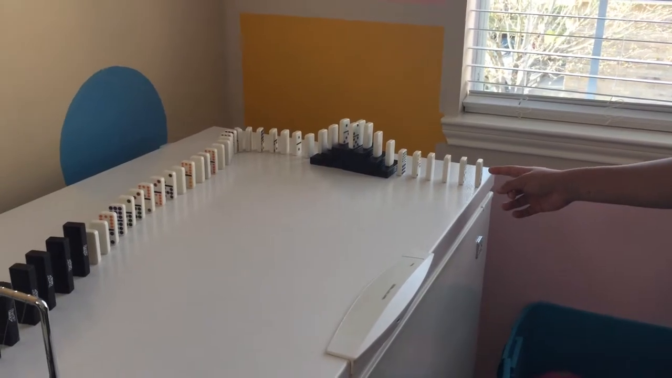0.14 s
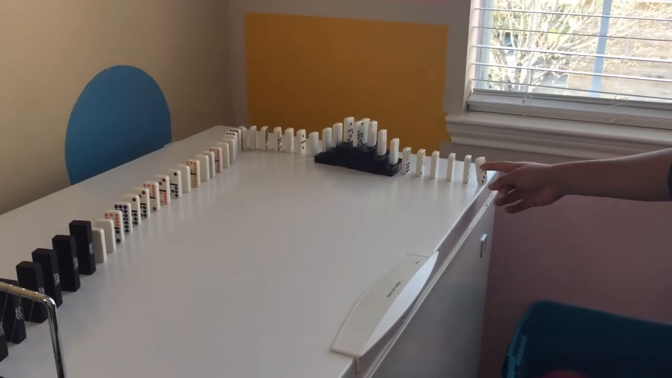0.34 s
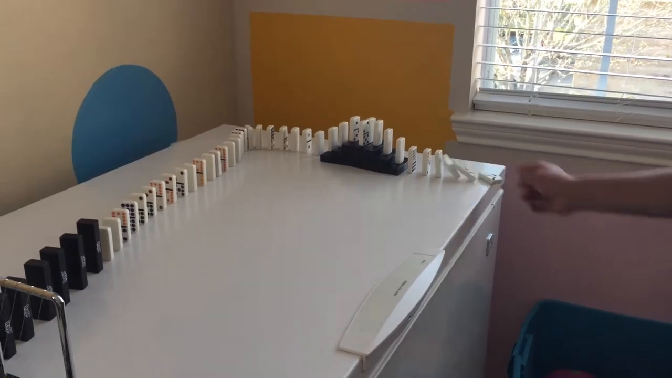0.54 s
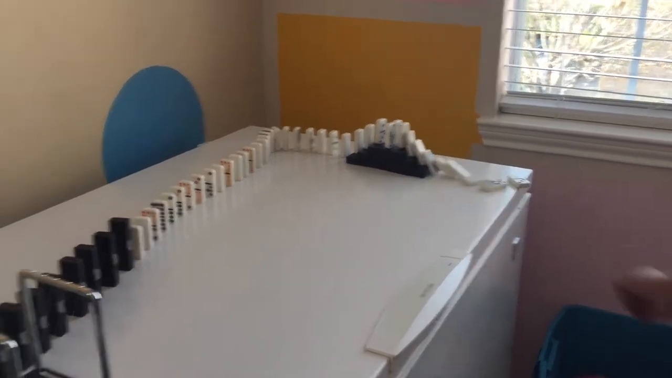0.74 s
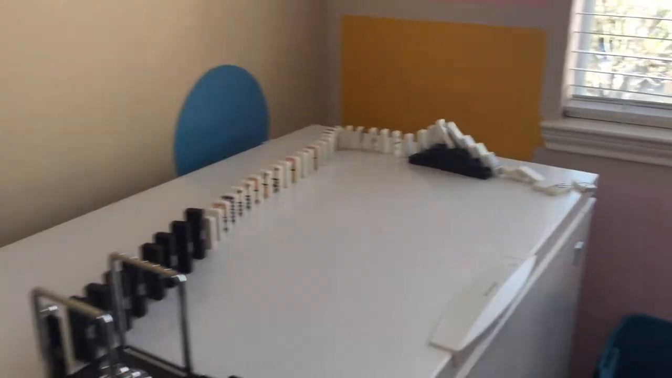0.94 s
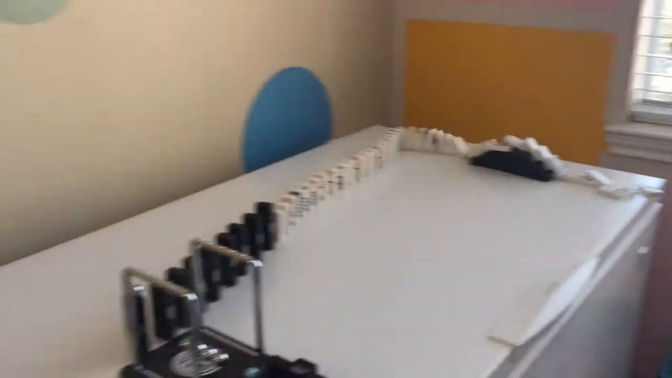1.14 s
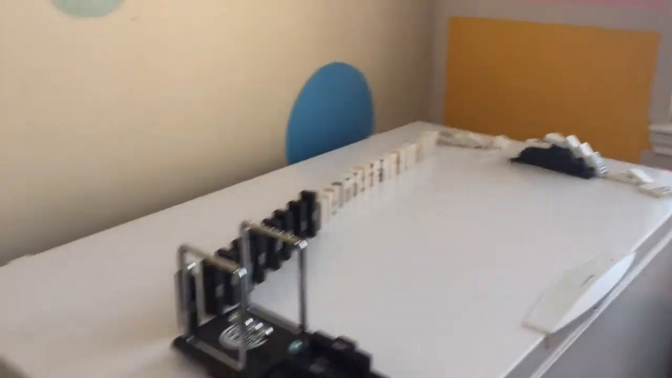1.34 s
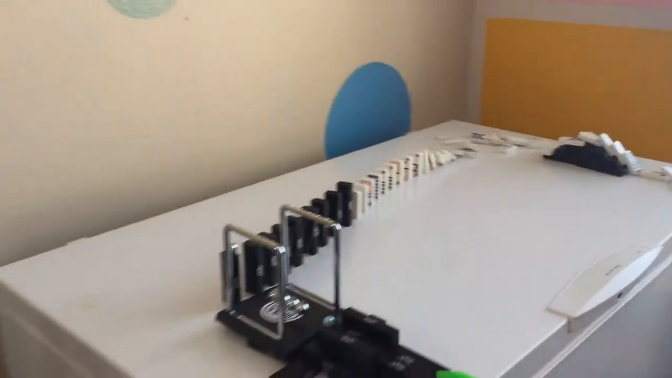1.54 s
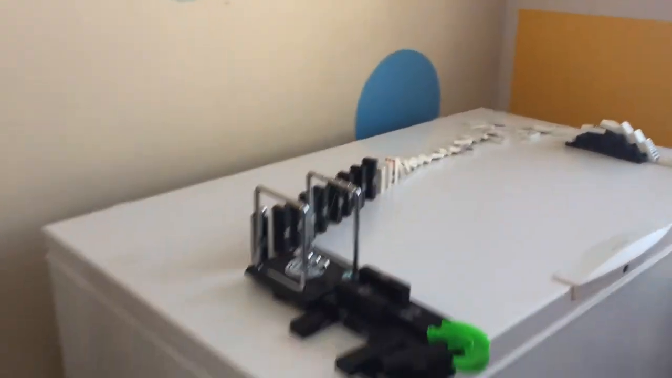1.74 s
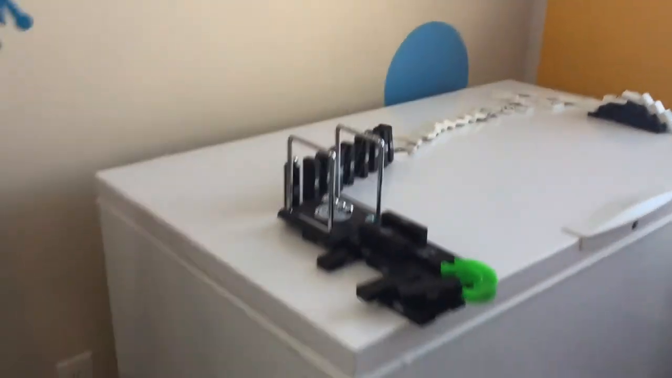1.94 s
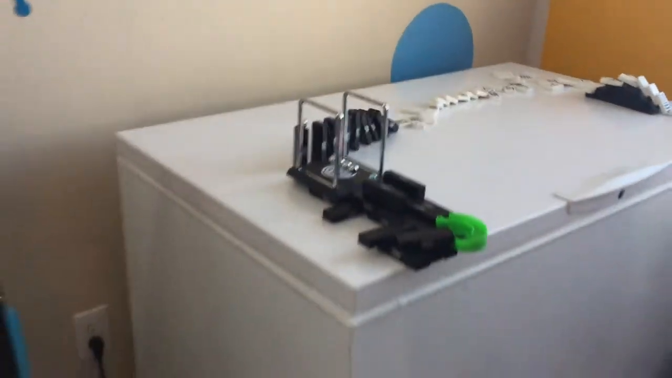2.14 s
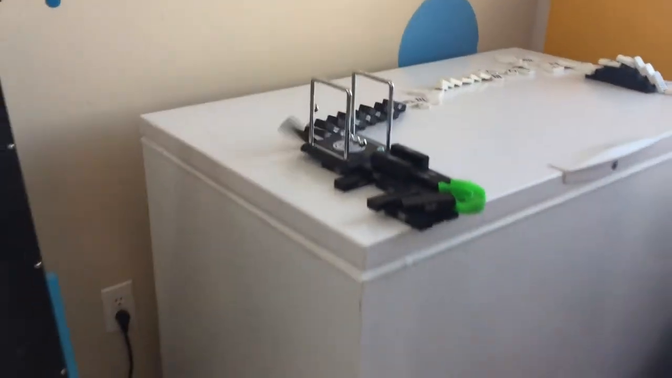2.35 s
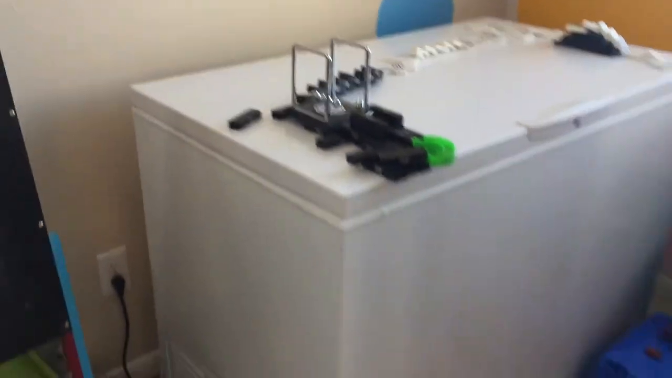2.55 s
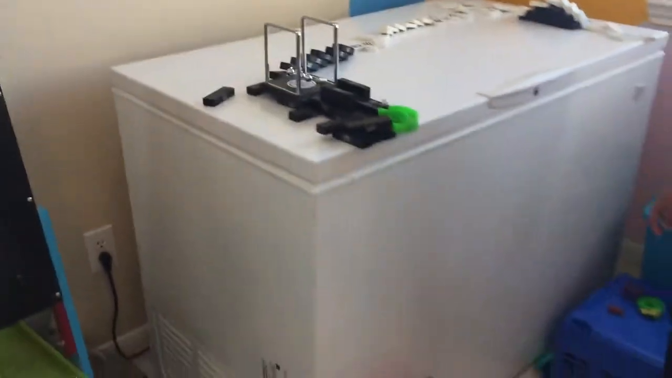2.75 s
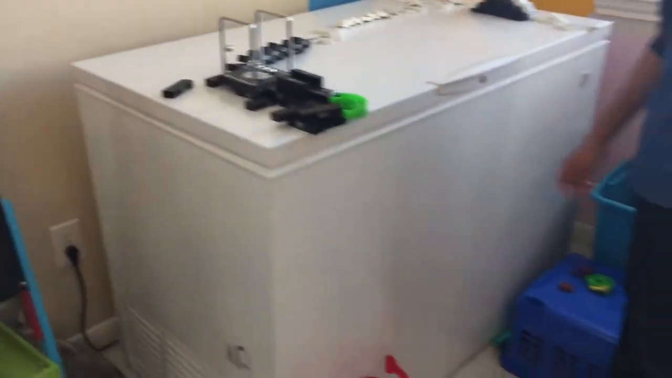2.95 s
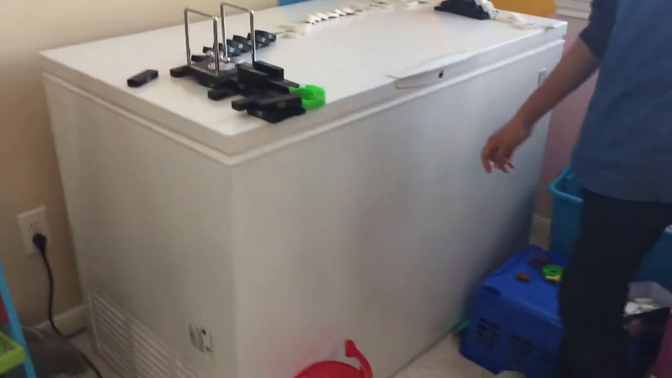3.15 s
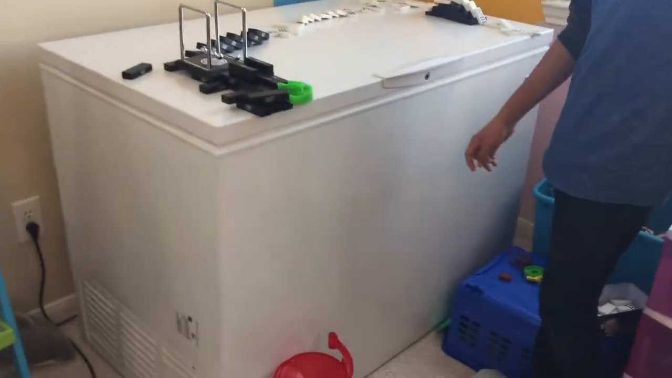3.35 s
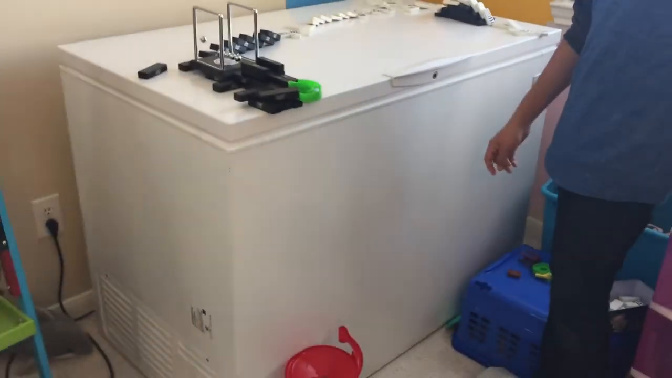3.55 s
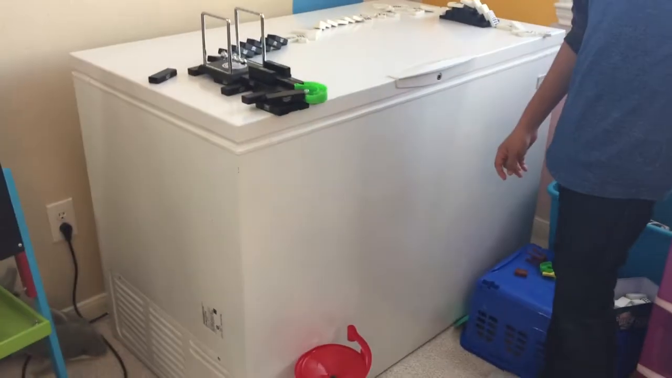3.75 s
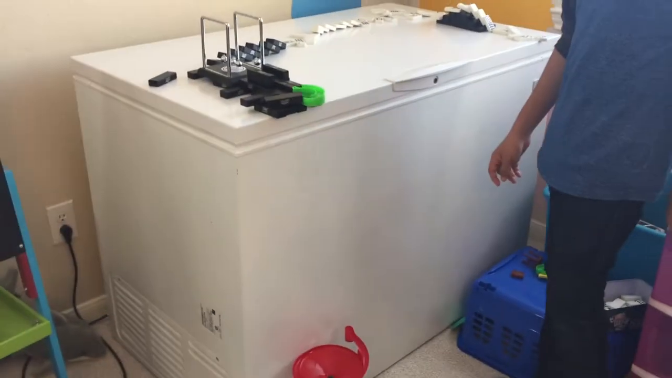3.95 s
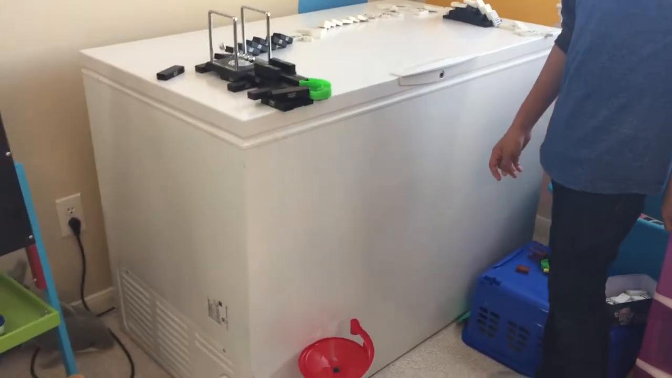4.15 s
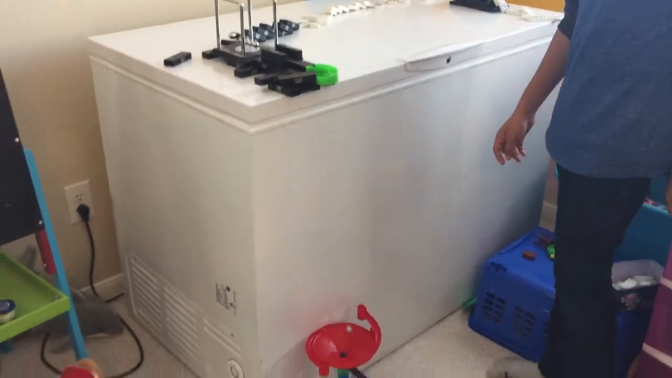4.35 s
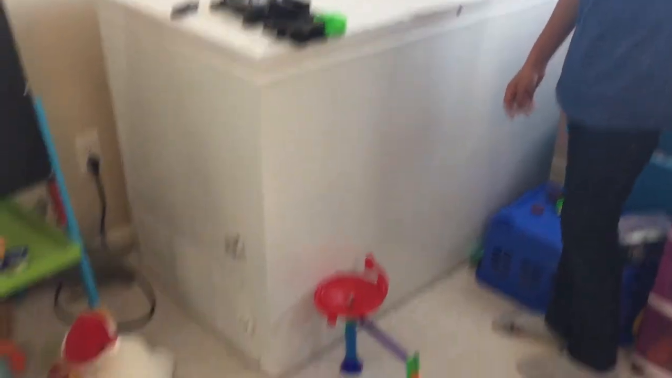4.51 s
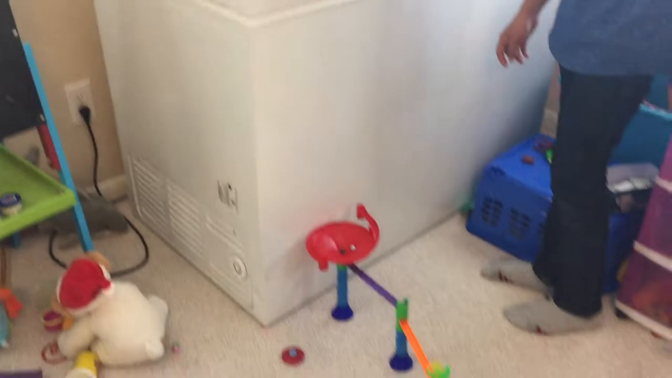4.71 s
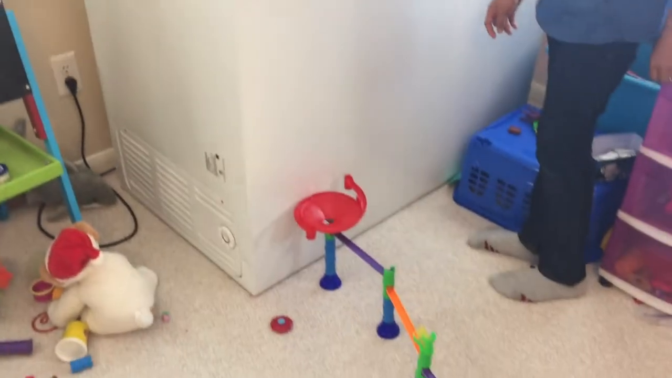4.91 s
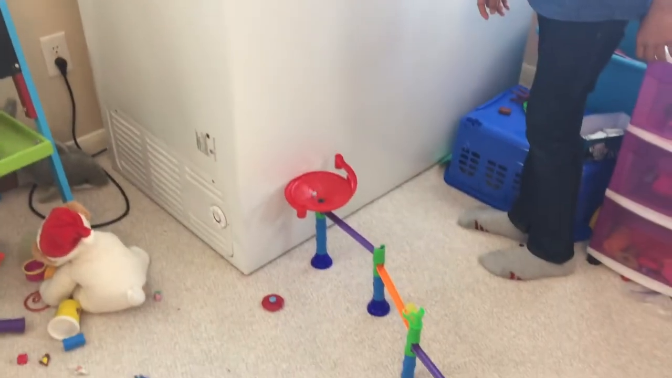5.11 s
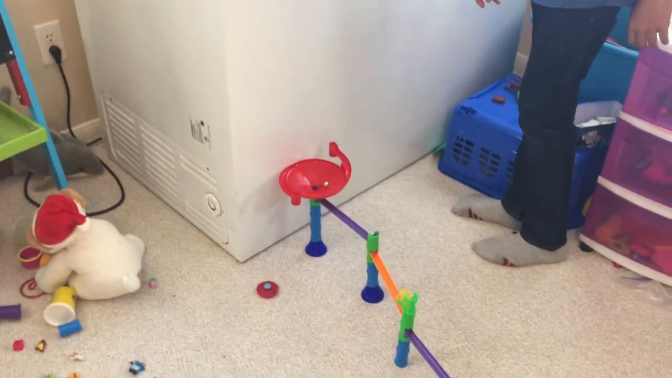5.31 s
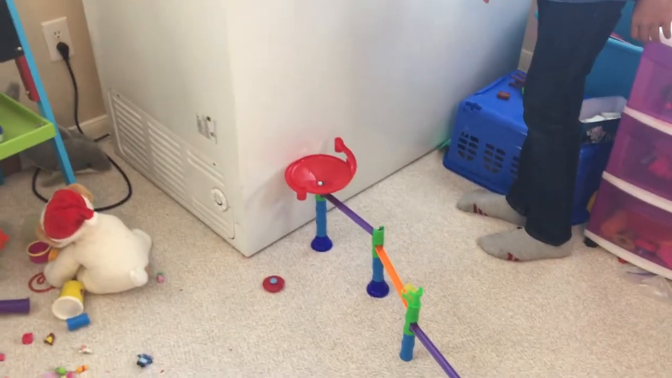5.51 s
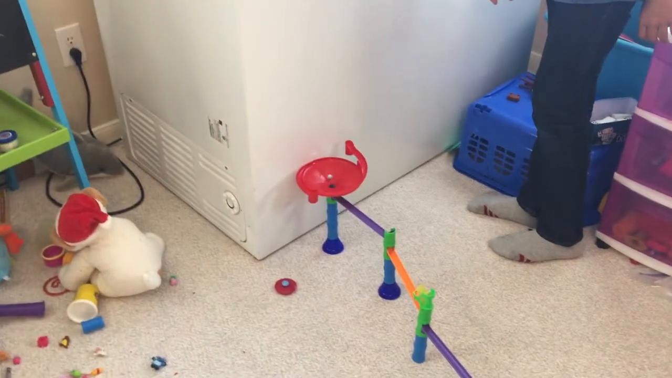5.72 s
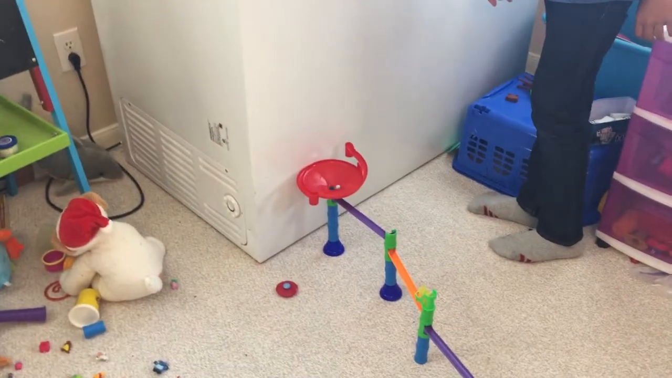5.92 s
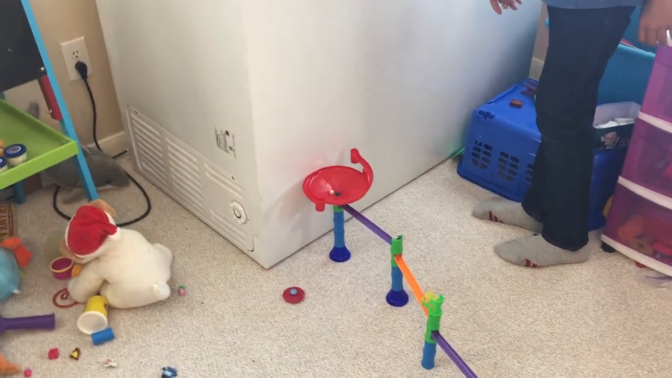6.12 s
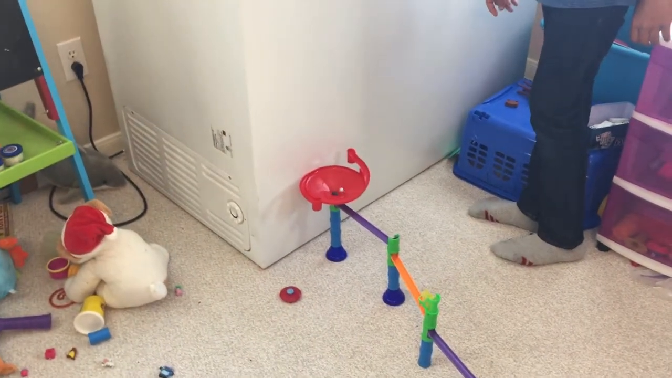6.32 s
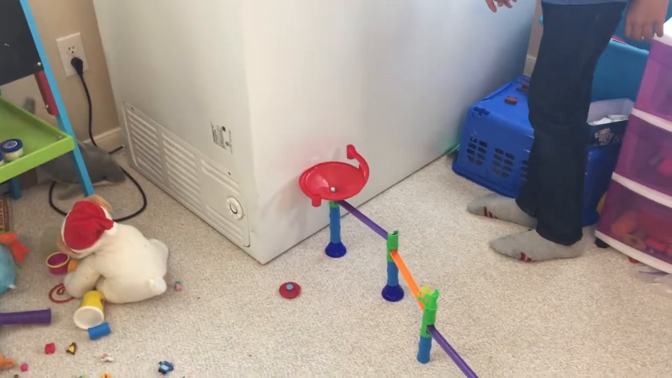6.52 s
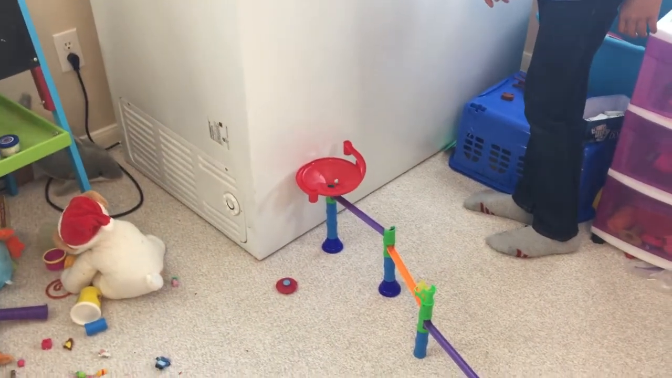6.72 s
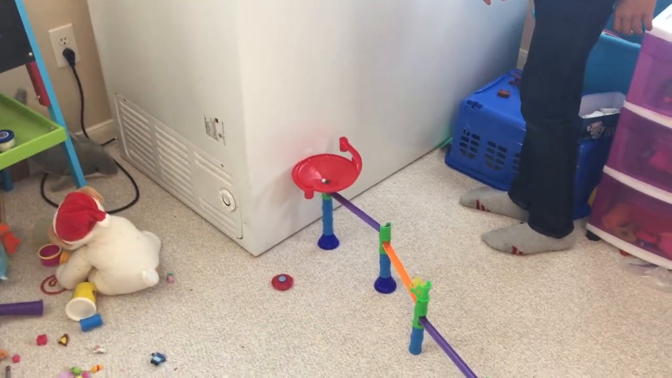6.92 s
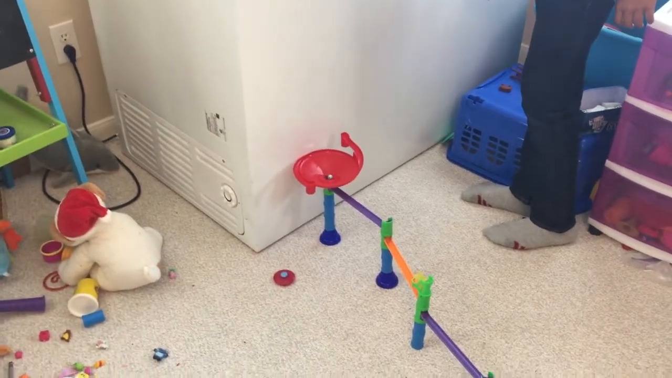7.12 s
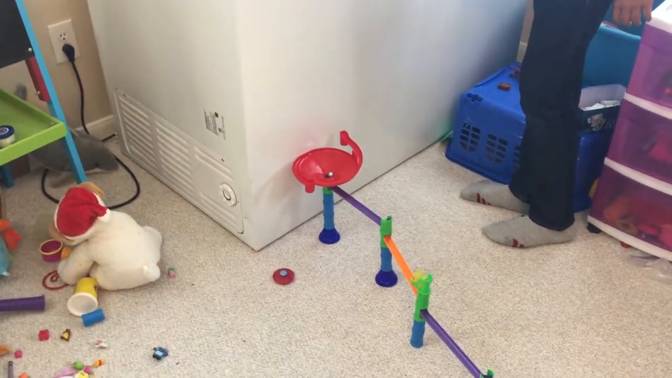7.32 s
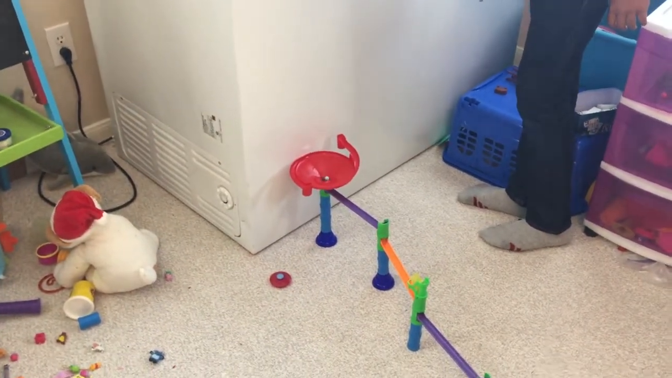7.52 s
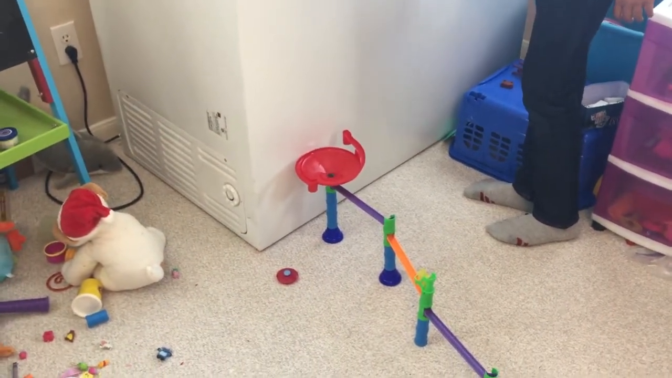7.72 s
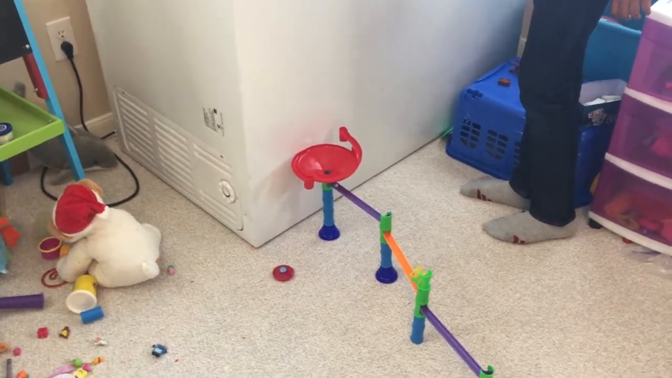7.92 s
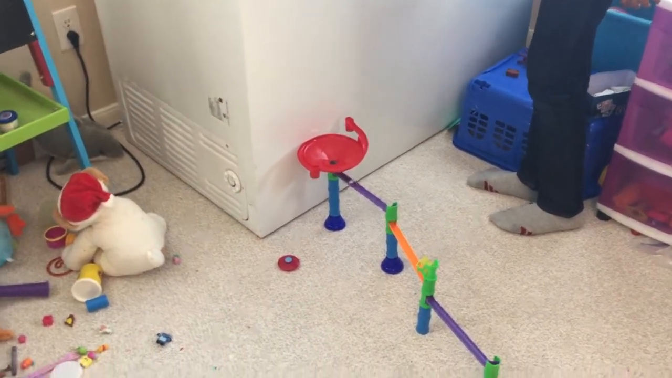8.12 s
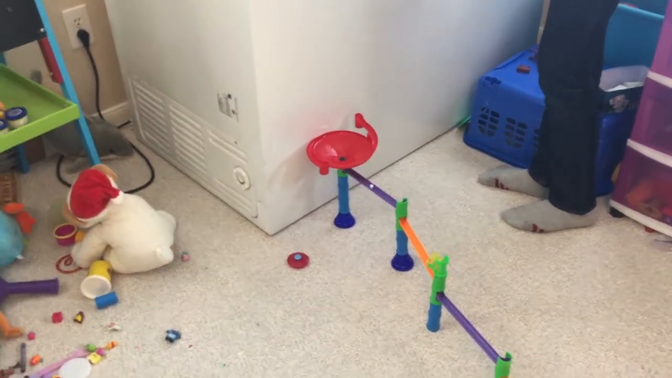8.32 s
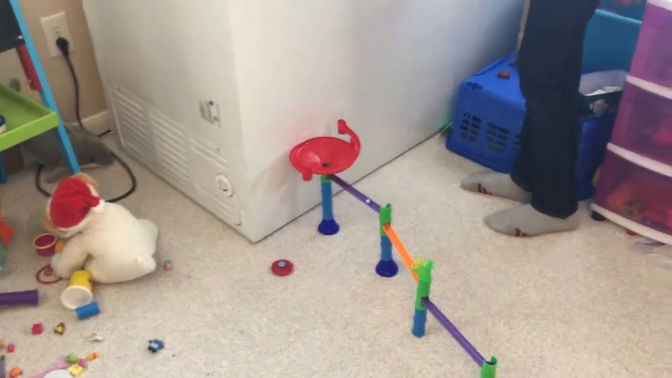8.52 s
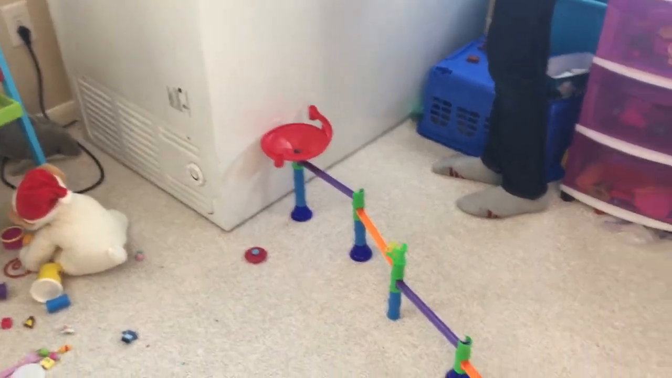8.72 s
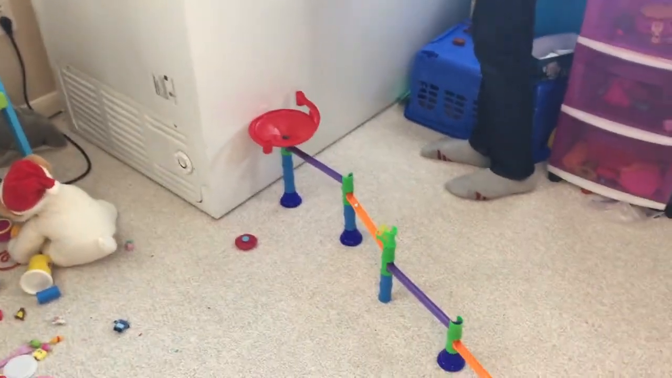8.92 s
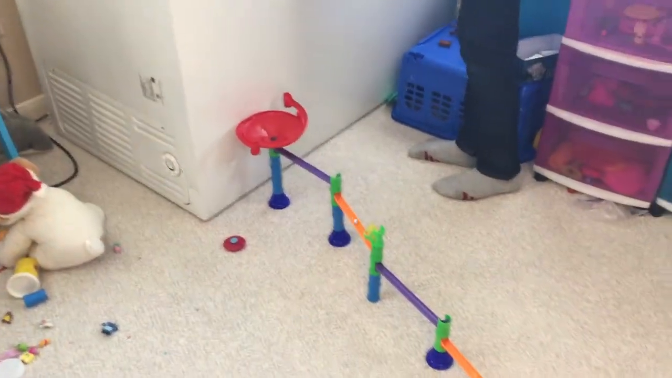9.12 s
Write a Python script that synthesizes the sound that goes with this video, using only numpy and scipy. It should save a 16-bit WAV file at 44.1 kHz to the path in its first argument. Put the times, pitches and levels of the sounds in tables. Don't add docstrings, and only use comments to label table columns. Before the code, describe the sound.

Dominoes topple rapidly along a metal freezer lid, then a steel-ball cradle clacks steadily while a marble drops, circles a plastic funnel and rolls out.

```python
import sys
import numpy as np
from scipy import signal
from scipy.fft import rfft, irfft
from scipy.io import wavfile
from scipy.ndimage import uniform_filter1d, map_coordinates

SR = 44100
rng = np.random.default_rng(int(sys.argv[2]) if len(sys.argv) > 2 else 0)


def unload_audio(sound):
    columns = np.transpose(np.atleast_2d(sound))
    steps = np.round(np.clip(columns, -1, 1) * 32767)
    wavfile.write(sys.argv[1], SR, steps.astype(np.int16))


def gain_from_db(level_db):
    decades = np.asarray(level_db, float) / 20
    return 10 ** decades


N = 403956
TIME_S = np.arange(N) / SR


def unit(x):
    return x / np.sqrt(np.mean(x ** 2) + 1e-20)


def along(points, hz):
    f, v = np.transpose(points)
    return np.interp(np.log(hz + 1), np.log(f + 1), v)


def curves(rows):
    s, *cols = np.transpose(rows)
    return [np.interp(TIME_S, s, c, -120, -120) for c in cols]


def wobble(rate_hz):
    coarse = np.arange(0, N + 64, 64)
    knots = rng.standard_normal(int(N * rate_hz / SR) + 4)
    return np.interp(np.arange(N), coarse, map_coordinates(knots, [coarse * rate_hz / SR]))


def filtered(x, response):
    impulse = irfft(response(np.fft.rfftfreq(16384, 1 / SR)))[:8192]
    return signal.oaconvolve(x, impulse / np.linalg.norm(impulse))[:N]


def coloured(x, spectrum):
    def response(hz):
        ceps = irfft(np.log(gain_from_db(along(spectrum, hz)) + 1e-6))
        ceps[1:len(hz) - 1] *= 2
        ceps[len(hz):] = 0
        return np.exp(rfft(ceps))
    return filtered(x, response)


def resonant(x, modes):
    def response(f):
        total = 0
        for k, (hz, width, db) in enumerate(modes):
            total = total + (-1) ** k * gain_from_db(db) * 1j * f * width / (hz * hz - f * f + 1j * f * width)
        return total
    return filtered(x, response)


def placed(seconds, shapes):
    at = np.round(np.asarray(seconds) * SR).astype(int)[:, None] + np.arange(shapes.shape[1])
    return np.bincount(at.ravel(), shapes.ravel(), N + SR)[:N]


def envelope(t, t60_s, rise_s):
    return gain_from_db(-60 * t / t60_s) * (1 - np.exp(-t / rise_s))


def blows(seconds, db, t60_s, push=0., rise_s=.0001):
    t = np.arange(2048) / SR
    chatter = rng.standard_normal((len(seconds), len(t))) * envelope(t, t60_s, rise_s)
    chatter /= np.linalg.norm(chatter, axis=1, keepdims=True)
    chatter[:, 0] = push
    return placed(seconds, gain_from_db(db)[:, None] * chatter)


def crackle(rate_hz, smooth):
    touch = rng.random(N) < rate_hz / SR
    return unit(unit(touch * rng.standard_normal(N)) + smooth * rng.standard_normal(N))


# t/s, whine level/dB, hum level/dB
COMPRESSOR = [(0, -69, -61), (.5, -73, -56), (2.5, -68.5, -57.5), (3.3, -82, -75), (3.6, -72.5, -71.5),
              (4.25, -76.5, -67), (4.8, -86, -72), (9.16, -103, -65)]
# f/Hz, density/dB
AIR_COLOUR = [(25, 8), (100, 4), (250, 9.5), (600, 3), (1300, -1.5), (2500, -3.5), (5000, -6),
              (10000, -11.5), (15900, -16.5)]


def freezer():
    whine_db, hum_db = curves(COMPRESSOR)
    turn = 2 * np.pi * TIME_S
    whine = np.sin(1308 * turn) * (1 + .3 * np.cos(59.4 * turn))
    hum = np.sin(59.4 * turn + 1.2 * wobble(9)) * gain_from_db(3.5 * wobble(16))
    air = coloured(rng.standard_normal(N), AIR_COLOUR)
    return gain_from_db(whine_db) * whine + gain_from_db(hum_db + 0.5) * hum + gain_from_db(-71.0) * air


# t/s, peak level/dB, floor f/Hz
STEPS = [(3.025, -54, 149), (3.118, -55.5, 264), (3.312, -56, 115), (3.607, -51.5, 226),
         (4.283, -44.5, 273.5), (4.587, -51, 104), (4.671, -54, 277.3), (6.265, -53.5, 105),
         (7.502, -63, 109), (8.274, -58, 108), (8.86, -52, 219), (9.033, -53.5, 214)]


def feet():
    s, db, hz = np.transpose(STEPS)
    t = np.arange(8192) / SR
    thump = np.sin(2 * np.pi * hz[:, None] * t) * envelope(t, 0.11, 0.0085)
    floor = resonant(rng.standard_normal(N), [(105, 56, 0.5), (179, 15, -5.5)])
    murmur = gain_from_db(-72.5 + 3.9 * wobble(30)) * floor
    return placed(s, gain_from_db(db + 10.5)[:, None] * thump) + murmur


# t/s, peak level/dB, hollow level/dB
FINGERTIP = [(.4386, -58, -4), (.446, -55, -4), (.455, -55, -3), (.464, -58, -3)]
# t/s, peak level/dB, hollow level/dB
TAPS = [ (2.7366, -30, -16), (2.772, -30, -23), (2.7872, -54, -16), (2.8718, -38.5, -17),
        (2.9339, -32.5, -10), (3.011, -38.5, -42), (3.1107, -46, -15.5), (3.1921, -38, -16.5),
        (3.216, -39, -25), (3.805, -48.5, -13.5)]
# f/Hz, width/Hz, level/dB
HOLLOW_WALLS = [(1523, 780, 3), (2100, 1000, 8), (2510, 97, 10.5), (3220, 470, -6.5)]
# f/Hz, width/Hz, level/dB
HOLLOW_AIR = [(547, 130, -10), (930, 150, -11.5)]


def nudges():
    s, db, hollow_db = np.transpose(FINGERTIP + TAPS)
    walls = resonant(blows(s, db + 16, 0.078, push=0.46), HOLLOW_WALLS)
    return walls + resonant(blows(s, db + hollow_db + 23.5, 0.051, push=0.23), HOLLOW_AIR)


# t/s, peak level/dB, ring f/Hz
TILE_BLOWS = [(0.5147, -42, 9500), (0.5572, -49, 9420), (0.5899, -13, 9570), (0.6473, -23, 8440),
              (0.6854, -29, 8500), (0.704, -11.5, 8760), (0.7426, -10.5, 8760), (0.7771, -12, 8460),
              (0.8001, -8.5, 9000), (0.8165, -6.5, 8250), (0.8515, -21, 8800), (0.877, -15, 8650),
              (0.909, -28, 8300), (0.9154, -17, 8430), (1.0264, -34.5, 9230), (1.026, -18.5, 9500),
              (1.0476, -31.5, 9330), (1.0578, -22.5, 8320), (1.095, -12, 9400), (1.1015, -13, 8330),
              (1.1316, -10, 8700), (1.1713, -18.5, 8400), (1.19, -16.5, 8620), (1.1988, -7, 9770),
              (1.2139, -10, 8650), (1.2326, -6, 9840), (1.2565, -22, 9320), (1.2696, -8.5, 9940),
              (1.303, -9, 9250), (1.3529, -11.5, 8300), (1.3888, -15, 9140), (1.3888, -18.5, 9140),
              (1.3993, -15, 8170), (1.429, -13, 9440), (1.465, -23.5, 9000), (1.4893, -32.5, 9330),
              (1.508, -13.5, 8060), (1.54, -10.5, 9400), (1.5707, -5.5, 8550), (1.611, -13.5, 8400),
              (1.638, -15.5, 8100), (1.6565, -8, 8500), (1.7151, -10, 8900), (1.749, -15, 9340),
              (1.7607, -6, 8590), (1.775, -13.5, 8440), (1.7878, -10, 8410), (1.8083, -12.5, 8300),
              (1.84, -6.5, 8200), (1.8982, -7.5, 8560), (1.9296, -9.5, 8630), (1.965, -12, 8700),
              (1.9994, -19.5, 8750), (2.0266, -25, 8590)]
# t/s, peak level/dB, ring f/Hz
THICK_BRICK = [(2.329, -19.5, 7450), (2.397, -29, 6900)]
# t/s, peak level/dB, edge level/dB, ring level/dB
SLOW_BRICKS = [(0.5112, -32, -37.5, -5), (0.519, -27.5, -41, -30.5), (2.029, -32.5, -6.5, -20),
               (2.049, -8.5, -14, -13), (2.146, -15, -18.5, -19.5), (2.187, -17.5, -19.5, -10.5),
               (2.228, -33, -15.5, -21.5), (2.255, -12.5, -15, -10), (2.33, -17, -22, -12),
               (2.36, -17.5, -30, -4), (2.397, -20, -26.5, -11), (2.46, -18.5, -40, -26),
               (2.482, -14, -32, -35.5), (2.506, -5.5, -12, -30.5), (2.571, -18.5, -20.5, -37)]
# t/s, commotion level/dB, hardness/dB
COMMOTION = [(0.5, -64.5, -18.5), (0.66, -46.5, -5), (0.81, -29.5, 4), (1.01, -57.5, 13),
             (1.26, -28.5, 9.5), (1.79, -28, 11), (2.1, -42.5, -10.5), (2.49, -43, -28),
             (2.75, -63.5, -17.5)]
# f/Hz, width/Hz, level/dB
TILE_MODES = [(6210, 910, -5.5), (8560, 320, 0.5), (9440, 620, -2)]
BRICK_HZ = 9500
REBOUND_S, REBOUND_DB = 0.004, -9


def tiles():
    bricks = [(s, db + ring_db, BRICK_HZ) for s, db, _, ring_db in SLOW_BRICKS]
    s, db, hz = np.transpose(TILE_BLOWS + THICK_BRICK + bricks)
    luck = rng.standard_normal((len(s), 3))
    s = np.append(s, s + REBOUND_S * np.exp(0.59 * luck[:, 0]))
    db = np.append(db, db + REBOUND_DB + 3 * luck[:, 1])
    hz = np.append(hz, hz * (1 + 0.068 * luck[:, 2]))[:, None]
    t = np.arange(2048) / SR
    pair = np.sin(2 * np.pi * hz * t) + .6 * np.sin(2 * np.pi * (hz - 170) * t)
    ring = placed(s, gain_from_db(db - 7.5)[:, None] * pair * envelope(t, 0.039, 0.0011))
    settling = gain_from_db(sum(curves(COMMOTION)) - 19 + 2.5 * wobble(60)) * crackle(900, 0.4)
    around = blows(s, db + 5, 0.045) + settling
    return ring + resonant(resonant(around, TILE_MODES), TILE_MODES)


# t/s, peak level/dB, edge level/dB
LID_SLAPS = [(0.52, -31, -43.5), (0.558, -24.5, -30), (0.594, -18.5, -7.5), (0.612, -7, -16),
             (0.684, -14.5, -23.5), (0.706, -17.5, -17.5), (0.746, -9.5, -14.5), (0.78, -13.5, -13),
             (0.806, -17, -23), (0.875, -35, -18.5), (0.919, -38.5, -21), (0.943, -37, -20),
             (0.999, -44, -35), (1.018, -48.5, -7), (1.028, -33.5, -7.5), (1.046, -37.5, -15.5),
             (1.058, -38.5, -1), (1.094, -20.5, -9.5), (1.133, -10, -21), (1.179, -16.5, -13),
             (1.214, -14, -9.5), (1.228, -12, -18), (1.268, -13.5, -13.5), (1.307, -18.5, -13.5),
             (1.321, -20, -16.5), (1.361, -14, -20), (1.387, -16, -20.5), (1.403, -16.5, -19.5),
             (1.419, -16, -15), (1.457, -26, -18.5), (1.474, -12, -12), (1.509, -14.5, -26.5),
             (1.542, -21, -22), (1.569, -21, -19), (1.597, -18, -23.5), (1.639, -15.5, -15.5),
             (1.659, -11, -15), (1.716, -18.5, -21), (1.726, -27, -21), (1.75, -16, -8),
             (1.811, -20, -21.5), (1.828, -17.5, -10.5), (1.851, -13, -9.5), (1.912, -9.5, -13),
             (1.965, -14.5, -23), (1.985, -13.5, -17.5), (2.028, -17.5, -20)]
# f/Hz, density/dB
LID_COLOUR = [(100, -12), (180, -21), (400, -5.5), (800, -1.5), (1800, 3.5), (3000, -1), (4800, -11),
              (7000, -15.5), (11000, -34.5), (16000, -43.5)]
# f/Hz, density/dB
BOOM_COLOUR = [(40, -43), (125, -8.5), (180, -5), (300, -9), (600, -12.5), (1500, -52)]
# f/Hz, density/dB
EDGE_COLOUR = [(1500, -34.5), (4000, 3), (7000, 3), (11000, 0.5), (15900, -3.5)]
BOOM_DB, BOOM_SOFTER = -9, 0.36


def lid():
    s, db, edge_db = np.transpose(LID_SLAPS + [row[:-1] for row in SLOW_BRICKS])
    commotion_db, hard_db = curves(COMMOTION)
    clatter = blows(s, db + 13.5, 0.045, push=0.24, rise_s=0.0086)
    clatter += blows(s, db + 7, 0.015, push=0.41)
    clatter += gain_from_db(commotion_db - 3 + 3.3 * wobble(40)) * crackle(500, 1.0)
    boom_db = commotion_db + BOOM_DB - BOOM_SOFTER * hard_db + 2.1 * wobble(15)
    boom = blows(s, db - 0.5, 0.14) + gain_from_db(boom_db) * rng.standard_normal(N)
    edge = blows(s, db + edge_db + 24, 0.076, push=0.4)
    edge += gain_from_db(commotion_db - 9.0 + 3.7 * wobble(38)) * crackle(770, 0.3)
    return coloured(clatter, LID_COLOUR) + coloured(boom, BOOM_COLOUR) + coloured(edge, EDGE_COLOUR)


# t/s, peak level/dB, middle gap closes/ms, far gap closes/ms
LANDINGS = [(2.5857, -5, 1, 3), (2.9013, -12, 2.6, 7.6), (3.222, -14, 1.3, 4), (3.5427, -13, 1.5, 6.1),
            (3.8632, -15, 5.3, 9.2), (4.1834, -15, 4.3, 10.6), (4.5041, -16, 7.7, 12.1),
            (4.8249, -15, 4.1, 12.3), (5.1454, -14, 6.1, 13.5), (5.4645, -17, 3.3, 14.8),
            (5.7852, -17, .9, 14.5), (6.1046, -17, 1.2, 14.6), (6.4232, -18, 4.1, 15),
            (6.7425, -17.5, 7.5, 14.2), (7.0608, -17.5, 5.2, 13.7), (7.3785, -19.5, 3.4, 13.7),
            (7.6963, -18.5, 5.3, 13.3), (8.0134, -20.5, 6.1, 13.4), (8.3305, -21.5, 7.9, 13.1),
            (8.6459, -24, 9.8, 13.7), (8.963, -23, 5, 10.8)]
# t/s, peak level/dB
STRAY_TOUCHES = [(2.6309, -21), (2.895, -30), (3.206, -32), (2.8701, -33), (3.1929, -28), (3.5181, -31),
                 (3.8223, -31), (4.1317, -32), (4.4334, -36), (5.0498, -32), (5.3571, -35), (5.3804, -39),
                 (5.6545, -38), (5.6838, -40), (5.9614, -37), (5.9918, -38), (6.2748, -32), (6.5856, -32),
                 (6.9131, -40), (7.0508, -40), (7.2162, -41), (7.3513, -42), (7.6539, -45), (7.8279, -36),
                 (7.962, -42), (8.1625, -46), (8.2769, -47), (8.464, -49), (8.315, -48), (8.5784, -47),
                 (8.6213, -48), (8.8695, -48)]
MIDDLE_DB, FAR_DB, GRAZE_DB = -3.5, -2.5, -10


def contacts():
    s, db, middle_ms, far_ms = np.transpose(LANDINGS)
    after_db = db + np.interp(s, [2.6, 3.2, 9], [-16, -1, 2])
    graze_ms = far_ms * rng.random(len(s))
    stray_s, stray_db = np.transpose(STRAY_TOUCHES)
    seconds = [s, s + middle_ms / 1000, s + far_ms / 1000, s + graze_ms / 1000, stray_s]
    levels = [db, after_db + MIDDLE_DB, after_db + FAR_DB, after_db + GRAZE_DB, stray_db]
    return np.concatenate(seconds), np.concatenate(levels)


# f/Hz, density/dB
STEEL_COLOUR = [(500, -33), (2000, -16), (3500, -7.5), (5000, -6.5), (7000, 2.5), (9500, 4.5), (12500, 4),
                (15500, -2), (17000, -24.5)]


def cradle():
    s, db = contacts()
    direct = blows(s - .0001, db - 3, 0.0023, push=3.47)
    wall_db = db + np.interp(s, [2.6, 3.4, 5.1], [-10, -3, -1.5])
    wall = blows(s + .00285, wall_db - 2.5, .005, push=2.8) + blows(s + .0058, db - 14, .004, push=2)
    frame = blows(s, db - 0.5, 0.02, rise_s=0.0022)
    return coloured(direct, STEEL_COLOUR), coloured(wall + frame, STEEL_COLOUR)


# t/s, peak level/dB, rim level/dB, tick level/dB, belly level/dB
KNOCKS = [(4.265, -44.5, -13, -16, 3), (4.277, -44, -24, -17.5, -0.5), (4.287, -6, -0.5, -9.5, 5),
          (4.309, -17.5, -11, -19.5, 2), (4.34, -21, -7.5, -16, 2.5), (4.61, -13, -3.5, -10.5, 3.5),
          (4.68, -16.5, -1, -14.5, -1), (4.743, -22.5, -2, -12, -1), (4.765, -37, 3, -7, 3),
          (4.774, -39, 1, -9, 0), (5.93, -52, 1.5, -17, -3), (6.381, -53, 2, -16, -3),
          (7.181, -51, 3.5, -16, -8), (7.354, -39.5, -22, -17, -2.5), (7.517, -33, 0.5, -13.5, -6),
          (7.531, -38, -8, -16, -3), (7.539, -40, -16, -29, -3), (7.621, -46, -12, -29, -5),
          (7.637, -44, -14, -29, -10), (7.741, -41, -15, -10.5, -1), (7.797, -32.5, -25, -18, -1.5),
          (7.817, -24, 3.5, -13, 7), (7.829, -34.5, -22, -15, 0.5), (7.838, -31, -25, -14.5, 1),
          (7.87, -38, -3, -5, -7), (7.894, -23, 2.5, -19, -9), (7.908, -26.5, -24, -25.5, -3),
          (7.944, -24.5, -10, -25, -10), (7.961, -32, -16, -28, -16.5), (8.138, -47, -7, -23.5, -14),
          (8.399, -43, -6.5, -23.5, -17.5), (8.487, -40.5, -9, -24, -15), (8.742, -48.5, -15.5, -26, -16),
          (8.794, -52.5, 4, -14, -13), (8.812, -51.5, 5, -17, -17), (8.821, -62, 2, -21, -17),
          (8.942, -43, 21, -22, -10)]
# f/Hz, width/Hz, level/dB
FUNNEL_MODES = [(1580, 190, -3), (1720, 200, 0), (1900, 260, -5), (2650, 280, -4)]
# f/Hz, width/Hz, level/dB
BELLY_MODES = [(560, 200, -16), (860, 200, -14), (1240, 190, -1), (1440, 190, 0)]
# f/Hz, width/Hz, level/dB
TRACK_MODES = [(1694, 500, 6.5), (2730, 270, -7)]
# f/Hz, width/Hz, level/dB
RIM_MODES = [(2680, 330, -2), (4100, 900, -3), (5500, 900, -9), (6700, 900, -10)]
# delay/s, level/dB
CORNER_RETURNS = [(.007, -7), (.0148, -7)]
TRACK_FROM_S, RIM_HZ, TRACK_HZ = 8.1, 3820, 2700
RIM_BACK_DB = -7


def marble():
    s, db, rim_db, tick_db, belly_db = np.transpose(KNOCKS)
    out = s > TRACK_FROM_S
    inside = ~out
    bowl = resonant(blows(s[inside], db[inside] + 10.5, 0.052, push=1.0), FUNNEL_MODES)
    bowl += resonant(blows(s, db + belly_db + 13.5, 0.063, push=0.48), BELLY_MODES)
    chute = blows(s[out], db[out] + 4.5, 0.048, rise_s=0.0032)
    bowl += resonant(resonant(chute, TRACK_MODES), TRACK_MODES)
    rim_hz = np.where(out, TRACK_HZ, RIM_HZ) * (1 + .012 * rng.standard_normal(len(s)))
    t = np.arange(1024) / SR
    turn = 2 * np.pi * rim_hz[:, None] * t
    pair = np.sin(turn) + .5 * np.sin(1.12 * turn)
    rim = placed(s, gain_from_db(db + rim_db)[:, None] * pair * envelope(t, 0.011, .0003))
    rim += resonant(blows(s[inside], (db + rim_db)[inside] + 8, 0.02, push=0.5), RIM_MODES)
    tick = coloured(blows(s, db + tick_db + 16.5, 0.015, push=0.84), STEEL_COLOUR)
    returned = bowl + gain_from_db(RIM_BACK_DB) * rim
    corner = sum(gain_from_db(back_db) * np.roll(returned, round(delay * SR)) for delay, back_db in CORNER_RETURNS)
    return bowl + rim + tick + corner


# t/s, level/dB, best driven f/Hz
PASSES = [(4.8, -58.5, 1510), (4.95, -67, 1500), (5.1, -69.5, 1500), (5.28, -63, 1100), (5.391, -63, 1500),
          (5.682, -63, 1200), (5.85, -70, 900), (5.976, -58.5, 1400), (6.1, -77, 1310), (6.3, -67, 1318),
          (6.388, -56, 1300), (6.62, -70, 1395), (6.76, -61, 1300), (6.9, -76, 1510), (7.199, -54, 1600),
          (7.372, -53, 1510), (7.53, -51, 1634), (7.65, -54, 1700), (7.76, -57, 1700), (7.85, -40.5, 1480),
          (7.948, -48.5, 1900), (8.2, -90, 1710), (8.3, -72, 1600), (8.42, -70, 1710), (8.6, -74.5, 1600),
          (8.74, -70.5, 1690), (8.81, -71.5, 1500), (8.96, -53, 2000)]
BEHIND_DB, ROLLS_FROM_S, PASS_S = -72.5, 4.78, 0.047


def lap_level():
    t = np.arange(0, N, 64) / SR
    level = gain_from_db(BEHIND_DB) + sum(gain_from_db(db) * np.exp(-((t - s) / PASS_S) ** 2) for s, db, _ in PASSES)
    return np.interp(TIME_S, t, (t > ROLLS_FROM_S) * level)


# f/Hz, width/Hz, level/dB
ROLLED_MODES = [(520, 80, -4), (700, 90, -3), (870, 70, -4), (1080, 90, -4), (1250, 90, -2), (1510, 110, 0),
                (1740, 120, -1), (1990, 130, -4), (2650, 250, -9), (3850, 350, -6)]
NARROW_DB = 6.5


def rolling():
    grit = crackle(1500, 1.54)
    s, _, best_hz = np.transpose(PASSES)
    best_octave = np.interp(TIME_S, s, np.log2(best_hz))
    hums = np.zeros(N)
    for hz, width, db in ROLLED_MODES:
        band = [hz - width * 0.5, hz + width * 0.7]
        mode = unit(signal.sosfilt(signal.butter(2, band, "band", fs=SR, output="sos"), grit))
        off_db = NARROW_DB * (np.log2(hz) - best_octave) ** 2
        hums += gain_from_db(db + 4 * wobble(12) - off_db) * mode
    hums /= np.sqrt(np.abs(uniform_filter1d(hums ** 2, size=4000)))
    return lap_level() * gain_from_db(2.1 * wobble(35)) * hums


# t/s, peak level/dB
JOINT_CRACKS = [(8.886, -29.5), (8.903, -21.5), (8.942, -22), (8.952, -33.5)]
# f/Hz, density/dB
CRACK_COLOUR = [(300, -33), (600, -5.5), (1200, -8), (2500, -1), (5000, -5.5), (8000, -4.5), (15500, -20)]


def joint():
    s, db = np.transpose(JOINT_CRACKS)
    crack = blows(s, db + 7.5, 0.0097, push=1.5)
    return coloured(crack + blows(s, db + 10, .07, rise_s=0.0016), CRACK_COLOUR)


# f/Hz, T60/s
WALL_T60 = [(150, 0.4), (1000, 0.48), (3000, 0.37), (8000, 0.33), (15800, 0.2)]


def room(x, gap_ms):
    step, wet = SR // 5, np.zeros(N + 2 * SR)
    for start in range(0, N, step):
        hz, t, z = signal.stft(rng.standard_normal(SR // 2), SR, nperseg=256)
        decay = gain_from_db(-60 * t / along(WALL_T60, hz)[:, None])
        tail = signal.istft(z * decay, SR, nperseg=256)[1]
        tail_ms = np.arange(len(tail)) / SR * 1000
        tail *= 1 - np.exp(-(tail_ms / gap_ms) ** 2)
        answer = signal.fftconvolve(x[start:start + step], tail / np.linalg.norm(tail))
        wet[start:start + len(answer)] += answer
    return wet[:N]


TOP_HZ = 16100


def scene():
    steady = freezer() + feet()
    slap, clink = nudges() + lid(), tiles()
    clack, echoes = cradle()
    knock, roll = marble() + joint(), rolling()
    clack_send_db = np.interp(TIME_S, [2.6, 3.3], [-11, -6])
    send = gain_from_db(-9.5) * clink + gain_from_db(-6.5) * slap + gain_from_db(clack_send_db) * clack
    send += gain_from_db(-13.0) * knock + gain_from_db(-10.0) * roll
    lasting = rfft(clink + slap + room(send, gap_ms=4.2) + roll + steady)
    lowpass = np.clip((TOP_HZ - np.fft.rfftfreq(N, 1 / SR)) / 400, 0, 1)
    return (clack + echoes + knock + irfft(lasting * lowpass, N))[None]


def top_cut(x):
    return signal.sosfilt(signal.butter(12, 16990, fs=SR, output="sos"), x)


def record(dry):
    thin = signal.sosfilt(signal.butter(2, 45, "high", fs=SR, output="sos"), dry)
    soft = thin / (1 + np.abs(thin / .95) ** 6) ** (1 / 6)
    return top_cut(soft)


dry = scene()
out = record(dry)
unload_audio(out)
```